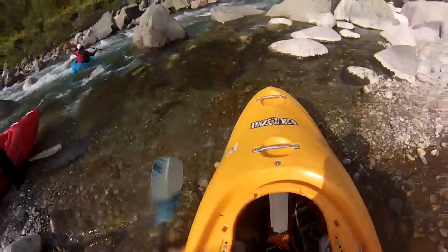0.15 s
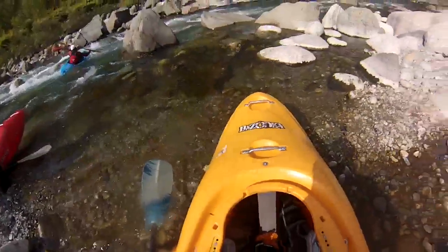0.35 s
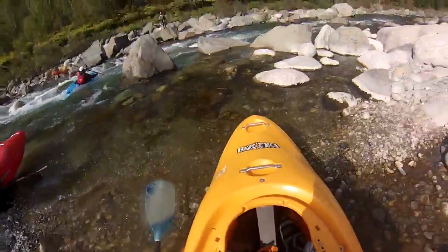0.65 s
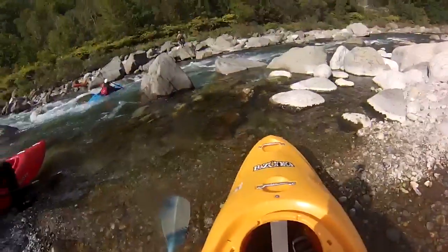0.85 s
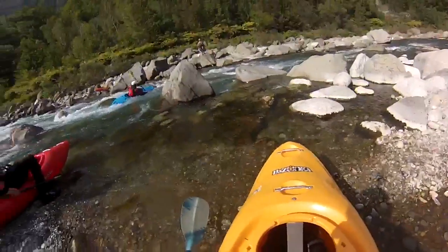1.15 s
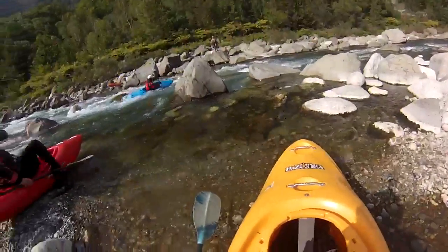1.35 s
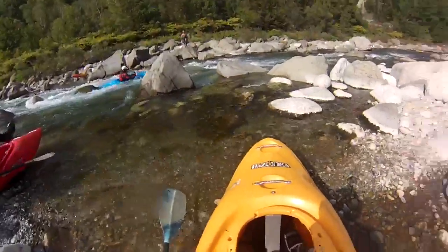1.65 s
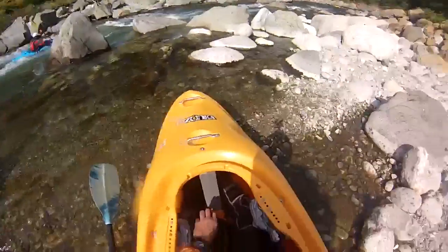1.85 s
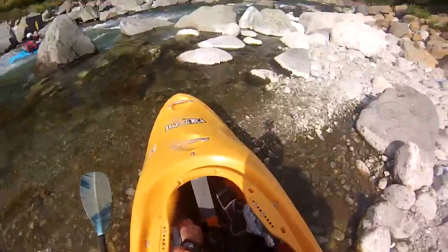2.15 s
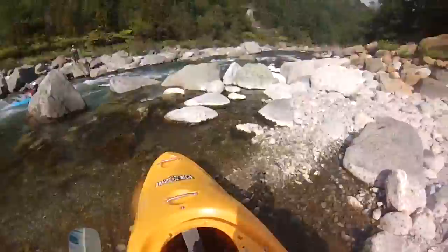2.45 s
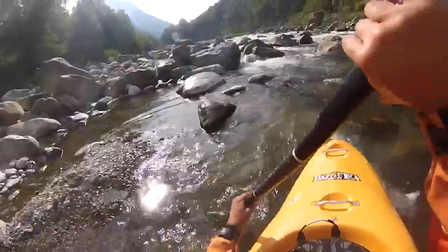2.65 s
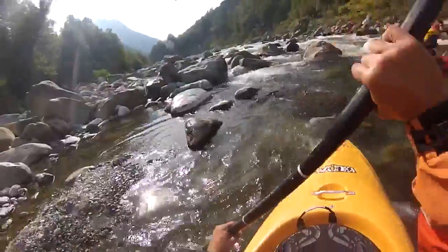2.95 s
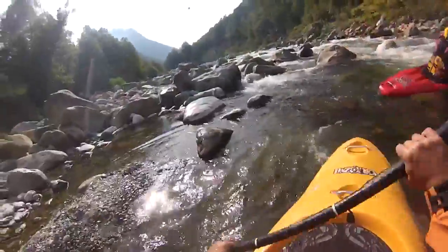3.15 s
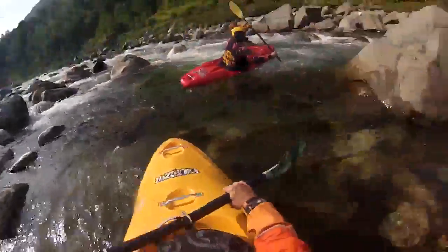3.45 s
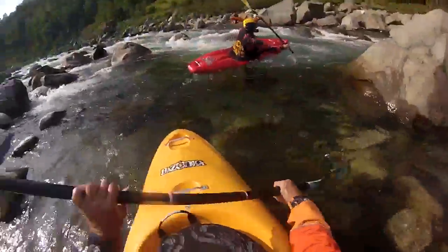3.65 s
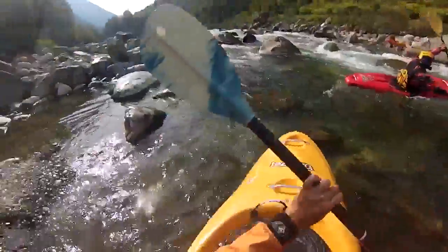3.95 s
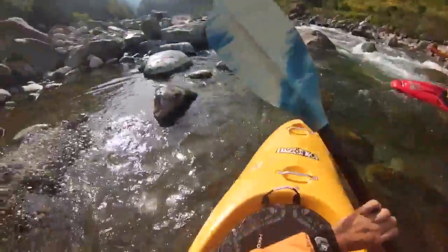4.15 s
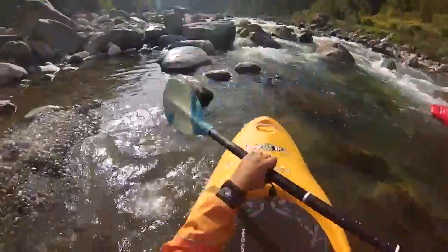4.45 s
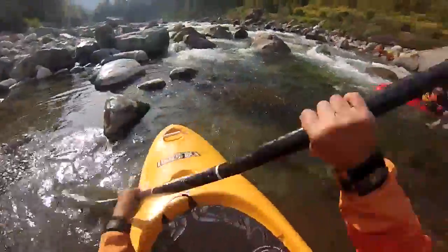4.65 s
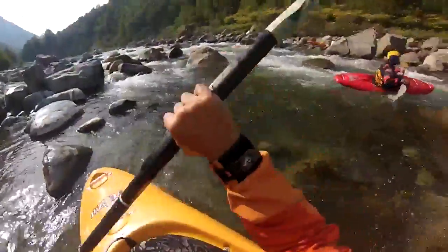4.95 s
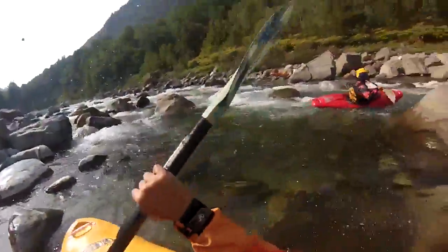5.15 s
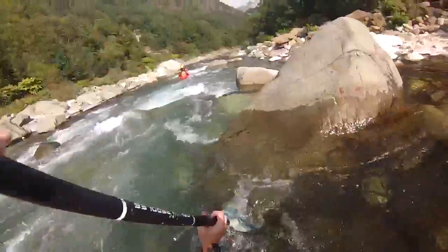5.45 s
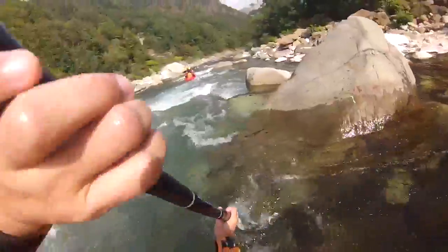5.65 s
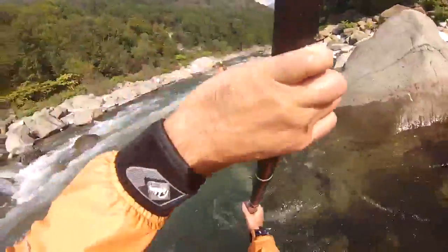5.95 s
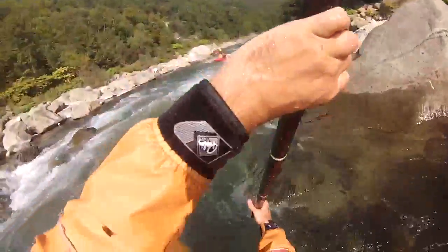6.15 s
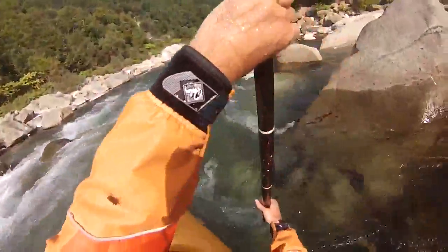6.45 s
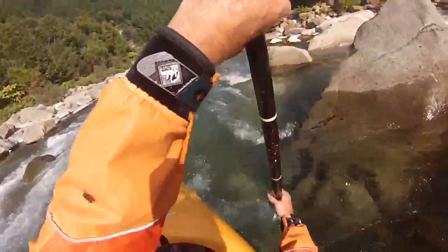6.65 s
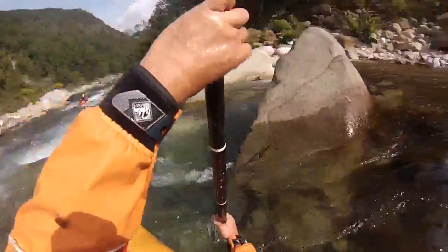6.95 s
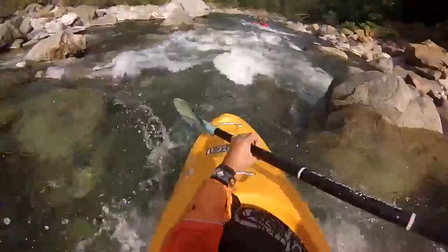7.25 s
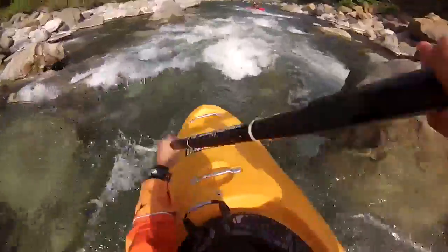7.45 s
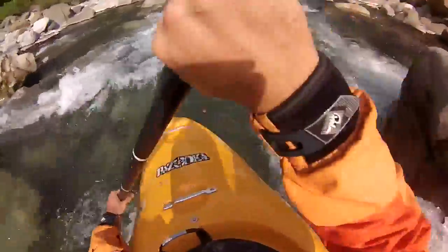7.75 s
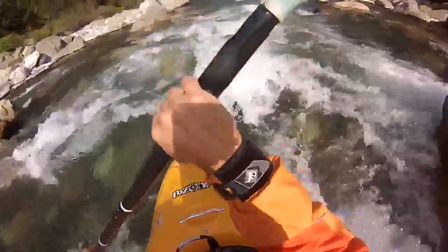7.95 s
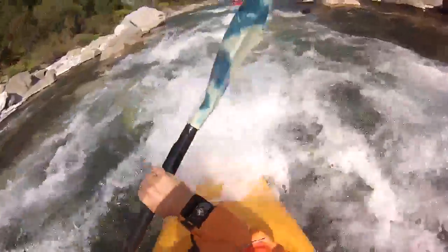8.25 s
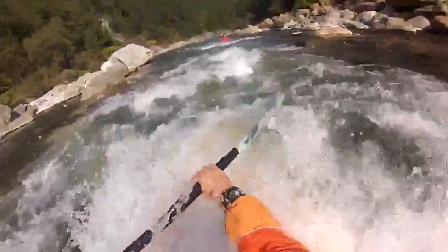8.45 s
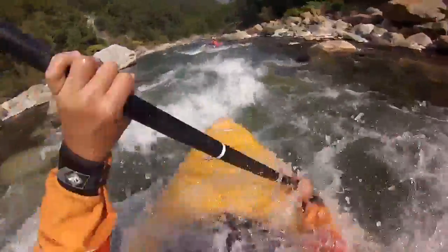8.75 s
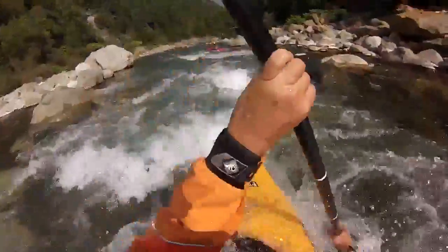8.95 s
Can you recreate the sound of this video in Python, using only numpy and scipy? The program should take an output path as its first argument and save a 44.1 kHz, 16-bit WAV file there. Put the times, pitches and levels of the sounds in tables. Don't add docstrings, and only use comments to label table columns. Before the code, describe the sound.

A kayak's rapids rush steadily louder under low wind buffeting, with close paddle splashes, plastic hull knocks, tiny drop ticks and short silent gaps.

```python
import sys
import numpy as np
from scipy import signal
from scipy.fft import rfft, irfft, next_fast_len
from scipy.io import wavfile
from scipy.ndimage import uniform_filter1d

SR = 44100
rng = np.random.default_rng(int(sys.argv[2]) if len(sys.argv) > 2 else 0)


def wav_record(signal):
    frames = np.transpose(np.atleast_2d(signal))
    bounded = np.clip(frames, -1, 1)
    quanta = np.round(bounded * 32767).astype(np.int16)
    wavfile.write(sys.argv[1], SR, quanta)


def ratio_of_db(decibels):
    return 10 ** (np.asarray(decibels, float) / 20)


N = 402191
TIME = np.arange(N) / SR

# (time [s], roar [dB], foam [dB])
RIVER_DISTANCE = [(0.03, -50.5, -1.5), (.4, -57, 4), (.8, -53.5, -0.5), (1.5, -56.5, 3), (2.5, -53.5, -0.5),
                  (2.62, -53, 0), (4.1, -54.5, 1), (4.68, -54.5, 2), (4.83, -45, -6.5), (5.0, -48, -4.5),
                  (5.24, -52, -1.5), (5.34, -48.5, -3), (7.2, -47, -1.5), (7.6, -45.5, -1.5),
                  (7.95, -42.5, 1), (8.25, -41, 1.5), (8.6, -40.5, 0), (9.02, -40.5, -2.5)]
# (frequency [Hz], density [dB per Hz])
WATER_COLOUR = [(60, -4), (110, 1.5), (300, 0), (800, -4), (1900, 2.5), (2650, -8.5), (2850, -17),
                (6000, -16), (7000, -18), (8000, -23.5), (8700, -27.5), (11000, -31), (15300, -37)]
DRUM_LO_HZ, DRUM_HI_HZ = 38.1, 55.6


def evened(x):
    return x / np.sqrt(np.mean(abs(x) ** 2) + 1e-20)


def read(points, hz):
    f, value = np.transpose(points)
    return np.interp(np.log(hz + 1), np.log(f + 1), value)


def controls(table, t):
    s, *columns = np.transpose(table)
    return [np.interp(t, s, c) for c in columns]


def add(mix, s, sound):
    part = mix[round(s * SR):][:len(sound)]
    part += sound[:len(part)]


def coloured(x, gain):
    size = next_fast_len(N)
    return irfft(rfft(x, size) * gain(np.fft.rfftfreq(size, 1 / SR)), size)[:N]


def above(hz, edge_hz, soft):
    return .5 + .5 * np.tanh(np.log((hz + 1) / edge_hz) / soft)


def swells(events, t):
    coarse = np.linspace(0, N / SR, 2000)
    lift_db = sum(db * np.exp(-4 * np.log(2) * ((coarse - s) / length) ** 2) for s, db, length in events)
    return np.interp(t, coarse, lift_db)


def through_case(hz):
    # (frequency [Hz], width [Hz], level over the water colour [dB])
    cavities = [(687.5, 24, 2.5), (1085, 140, 3.5), (1413, 406, 12.5), (1867, 98, -6.5), (2360, 560, 13.5),
                (3055, 98, 4.5), (3600, 710, 5.5), (4170, 60, 3.5), (4866, 140, 6), (5300, 280, 3.5),
                (5880, 240, -2.5), (6100, 280, 1.5), (7230, 300, -5), (7680, 660, 2.5), (10900, 1900, 3)]
    lift_db = sum(db / (1 + (2 * (hz - f) / width) ** 2) for f, width, db in cavities)
    return ratio_of_db(read(WATER_COLOUR, hz) + lift_db)


def bubbles(per_s, spread_db, cycles, count):
    out = np.zeros(N)
    for hz in np.geomspace(150, 14000, count):
        turns = np.arange(int(3 * cycles * SR / hz)) * hz / SR
        ping = np.sin(2 * np.pi * turns * (1 + 0.017 * turns)) * turns * np.exp(-3 * turns / cycles)
        chance, size = rng.random(N), rng.exponential(1, N)
        train, hit = np.zeros(N), chance < per_s * hz ** .5 / 40 / count / SR
        train[hit] = ratio_of_db(spread_db * np.minimum(size[hit], 4))
        out += evened(signal.oaconvolve(train, ping)[:N]) * hz ** .5
    return evened(out)


def water(t):
    # (start [s], low wash re roar [dB], fizz re roar [dB],
    # sound between the two main cavities re roar [dB], upper flank of the first cavity [dB])
    shots = [
        (0, -2.5, -10, -17, 6),
        (2.556, -1, -8.5, -15.5, -0.5),
        (3.92, 0.2, -7, -13, 1),
        (5.29, -1.5, -6, -11.5, 2.5),
        (7.256, -4.5, -5, -13, -0.5),
        (9.056, -2, -4.5, -12, .1),
    ]
    # (time [s], lift of the roar [dB])
    waves = [(.67, 0), (1.05, 0.5), (1.7, 0.5), (2.46, 0), (3.27, 0.5), (3.53, 2), (4.17, 1.5), (4.3, -3),
             (4.43, 3.5), (5.88, -1.5), (6.14, 2), (6.27, -1), (6.46, 2.5), (6.66, -1), (7.83, 1),
             (7.96, -2), (8.59, 4), (8.72, -1.5)]
    # (time [s], lift of the low wash [dB], length [s])
    surges = [
        (4.98, -2, 0.63),
        (6.04, 1, 0.28),
        (8.3, -1, 0.36),
        (7.66, 4.5, 0.42),
    ]
    wave_s, last_roar_db = 0.12, -54
    wash_steady = 0.83
    gap_per_foam = 0.67
    near_db, foam_db = controls(RIVER_DISTANCE, t)
    starts, *mix_db = np.transpose(shots)
    shot = np.maximum(np.searchsorted(starts, t) - 1, 0)
    wash_db, fizz_db, gap_db, flank_db = (m[shot] for m in mix_db)
    near_db = np.where(shot == len(shots) - 1, last_roar_db, near_db)
    wave_db = swells([(*wave, wave_s) for wave in waves], t)
    steady_db = foam_db - wash_steady * wave_db
    wash_db = wash_db + steady_db + swells(surges, t)
    return near_db + wave_db, wash_db, fizz_db + steady_db, gap_db + gap_per_foam * steady_db, flank_db


def turning(hz, t):
    # (time [s], lift [dB], length [s], centre [Hz])
    head_turns = [(.8, 3, .3, 3500), (2.85, 2, .5, 5100), (3.5, 2, 1, 5200), (3.6, -2, 1.3, 7600),
                  (4.15, 3, .5, 1000), (4.3, 5, 0.62, 1900), (4.5, 2, 0.27, 5440), (5.05, 6, .4, 5000),
                  (5.0, 2, .6, 7800), (4.7, 3, .7, 10800), (5.6, -3.5, .4, 5300), (6.3, 2, 1.2, 9000),
                  (6.7, -1.5, .9, 1059), (7.45, -3, 0.27, 1910), (7.85, -1, 0.52, 2350), (8.1, 3, .7, 6100),
                  (8.2, -2.5, 0.99, 3080), (8.205, 0, .5, 7200), (8.0, -1.5, .8, 9400),
                  (8.25, 0, .5, 10800), (8.3, -2.5, 1.5, 13800)]
    octaves = 0.1
    bands = np.array([np.exp(-.5 * (np.log2((hz + 1) / turn[3]) / octaves) ** 2) for turn in head_turns])
    return bands.T @ np.array([swells([turn[:3]], t) for turn in head_turns])


def river():
    nearness = np.clip((controls(RIVER_DISTANCE, TIME)[0] + 60) / 60, 0, 1)
    drive = np.sqrt(1 - nearness) * rng.standard_normal(N)
    drive += np.sqrt(nearness) * bubbles(2500, spread_db=0.5, cycles=4.0, count=30)
    hz, t, z = signal.stft(drive, SR, nperseg=512, noverlap=384)
    roar_db, wash_db, fizz_db, gap_db, flank_db = water(t)
    patches = uniform_filter1d(rng.standard_normal(z.shape), size=8, axis=0)
    patches = evened(uniform_filter1d(patches, size=16, axis=1))
    flicker = evened(uniform_filter1d(rng.standard_normal(len(t)), size=5))
    colour = through_case(hz)
    high, low = above(hz, 2860, 0.09), 1 - above(hz, 994, 0.14)
    gap = above(hz, 1550, 0.01) - above(hz, 2470, 0.038)

    def strength(lo, hi):
        return np.sqrt((colour[(hz > lo) & (hz < hi)] ** 2).sum() / len(hz))

    layers = np.outer((1 - high - low - gap) / strength(1000, 2900), np.ones(len(t)))
    layers += np.outer(low / strength(110, 1100), ratio_of_db(wash_db))
    layers += np.outer(gap / strength(1750, 2050), ratio_of_db(gap_db))
    layers += np.outer(high / strength(2664, 8700), ratio_of_db(fizz_db))
    z = z * layers * ratio_of_db(roar_db + turning(hz, t) + 0.61 * patches + 0.56 * flicker)
    flank = np.exp(-((hz - 1620) / 137) ** 2)
    z *= ratio_of_db(np.outer(flank, flank_db))
    return coloured(signal.istft(z, SR, nperseg=512, noverlap=384)[1][:N], through_case)


def drumming(noise):
    # (start [s], length [s], level [dB])
    drum_bouts = [(.1, 0.13, -41), (1.002, .15, -47.5), (1.98, 0.069, -32), (2.65, 0.27, -48),
                  (3.303, 0.12, -43), (3.6, 0.19, -41), (4.028, .037, -29), (4.088, 0.029, -34),
                  (4.154, .053, -35), (4.746, .067, -35), (4.85, .2, -41), (5.104, 0.091, -43),
                  (5.498, 0.13, -42.5), (6.0, 0.22, -40), (6.816, 0.076, -35), (7.702, .1, -44),
                  (7.867, 0.089, -36.5), (8.137, .04, -35), (8.302, 0.1, -38), (8.405, .042, -32),
                  (8.541, 0.13, -33)]
    calm_db = -47.5
    note = coloured(noise, lambda f: above(f, DRUM_LO_HZ, 0.06) - above(f, DRUM_HI_HZ, 0.13))
    lumps = np.sqrt(abs(uniform_filter1d(uniform_filter1d(note ** 2, size=1500), size=1500)))
    coarse = np.linspace(0, N / SR, 2000)
    level = ratio_of_db(calm_db)
    for s, length, db in drum_bouts:
        level = level + ratio_of_db(db) * np.exp(-(2 * (coarse - s - length / 2) / (1.2 * length)) ** 4)
    return np.interp(TIME, coarse, level) * evened(note / (lumps + 0.076 * lumps.mean()))


def wind():
    # (time [s], buffeting [dB])
    strengths = [(0, -24), (.35, -34.5), (1.0, -33.5), (1.6, -34.5), (2.0, -28.5), (2.5, -33), (2.65, -29),
                 (3.5, -34), (4.2, -36.5), (5.0, -31), (5.25, -37.5), (5.4, -38), (6.1, -37), (7.1, -35),
                 (7.35, -29), (8.0, -32), (8.65, -27), (9.1, -26.5)]
    # (frequency [Hz], density [dB per Hz])
    buffet_colour = [(3, -11), (6, -2), (16, 2), (30, -4), (40, -0.5), (50, -14.5), (63, -16.5), (90, -28),
                     (150, -32), (220, -40), (400, -120)]
    # (time [s], lift of the buffeting [dB], length [s])
    gusts = [(.03, 12, 0.14), (.23, 5, 0.091), (.6, 7, 0.28), (.84, 9, 0.17), (1.22, 5, 0.23),
             (1.45, 6.5, 0.15), (1.95, 8.5, 0.071), (2.25, 2, .12), (2.73, 2, 0.13), (3.14, -7, 0.052),
             (3.35, 14, 0.025), (3.76, 2.5, 0.056), (3.97, 7.5, 0.25), (4.17, 12.5, 0.17), (4.48, 8, 0.3),
             (4.58, -10.5, 0.13), (4.69, 3.5, 0.39), (4.99, 2.5, 0.15), (5.48, 6.5, 0.097),
             (5.69, 3.5, 0.15), (5.9, -1, 0.11), (6.14, 5.5, 0.13), (6.43, 2.5, .12), (6.74, 8, 0.06),
             (7.06, -1, 0.11), (7.86, 5, 0.24), (8.05, -3.5, 0.099), (8.15, 5.5, 0.2), (8.6, 11, 0.11),
             (8.97, -2, 0.14)]
    # (time [s], lift over the calm level [dB], length [s])
    flutters = [(.02, 18, 0.23), (.36, 10, 0.18), (.74, 9, 0.18), (.94, 8, 0.14), (1.35, 5, 0.079),
                (1.55, -2, 0.13), (2.005, 26, 0.05), (2.36, 7.5, 0.15), (2.95, 7.5, 0.53), (3.25, 4, 0.13),
                (3.66, -12, .12), (3.95, 6, 0.17), (4.17, -8, .12), (4.53, -8, 0.18), (4.78, 5, 0.13),
                (5.78, 16, 0.17), (5.93, 8, 0.16), (6.11, 15, 0.24), (6.4, 13, 0.23), (6.85, 28, 0.087),
                (7.17, 8.5, 0.13), (7.33, 5, .12), (7.64, 10, 0.1), (7.84, 12, 0.18), (8.4, 13.5, 0.21),
                (8.66, 15.5, .12), (8.87, 12, 0.11)]
    # (time [s], peak [dB], pitch
    # [Hz], direction and share [-1 to 1])
    thumps = [(0.0, -22, 3.1, 0.88), (9.113, -29, 18, 1), (.113, -15, 18.6, 0.85), (2.152, -18, 30, 0.89),
              (2.711, -19.5, 15.3, 0.9), (8.178, -16, 27.5, 0.93), (2.009, -8.5, 37.4, 0.89),
              (4.063, -12.5, 22, -0.82), (4.406, -13, 21.3, -0.9), (6.851, -19.5, 25.5, 0.81),
              (8.59, -12, 23.3, -0.8)]
    calm_flutter_db, flutter_per_wind = -59, 0.01
    buffet_db = controls(strengths, TIME)[0] + swells(gusts, TIME)
    flutter_db = calm_flutter_db + flutter_per_wind * (buffet_db - buffet_db.mean()) + swells(flutters, TIME)
    noise = coloured(rng.standard_normal(N), lambda f: ratio_of_db(read(buffet_colour, f)))
    slow = coloured(noise, lambda f: 1 - above(f, DRUM_LO_HZ, 0.11))
    lumps = np.sqrt(uniform_filter1d(slow ** 2, size=4000, mode="reflect"))
    slow = evened(slow / (uniform_filter1d(lumps, size=3000) + 0.088 * lumps.mean()) ** 0.88)
    flutter = evened(coloured(noise, lambda f: above(f, 53.0, 0.047)))
    out = ratio_of_db(buffet_db - 2.0) * slow + drumming(noise) + ratio_of_db(flutter_db) * flutter
    for s, db, hz, way in thumps:
        near = slice(*np.searchsorted(TIME, [s - 2 / hz, s + 2 / hz]))
        u = (np.pi * hz * (TIME[near] - s)) ** 2
        out[near] *= 1 - .8 * np.exp(-u / 3)
        out[near] += way * ratio_of_db(db) * (1 - 2 * u) * np.exp(-u)
    return out


def electronics():
    # (frequency [Hz], level [dB])
    whines = [(3478, -96), (3537, -87), (6955, -92), (7014, -94), (10492, -94), (12290, -96), (13964, -90),
              (15224, -101)]
    # (frequency [Hz], density [dB per Hz])
    hiss_colour = [(100, -118), (6000, -118), (9000, -114), (12500, -115), (13500, -117), (15300, -121)]
    out = coloured(rng.standard_normal(N), lambda f: ratio_of_db(read(hiss_colour, f)) * np.sqrt(SR / 2))
    wander = np.cumsum(rng.standard_normal(N)) * .03
    for hz, db in whines:
        out += np.sqrt(2) * ratio_of_db(db) * np.sin(2 * np.pi * hz * TIME + wander)
    return out


def knocks():
    # (time [s], peak [dB], pitch [Hz], t60
    # [s])
    ringing_hits = [(.364, -38, 1440, 0.042), (2.003, -32.5, 126, .07), (.086, -54, 5050, .04),
                    (.117, -52, 5000, .03), (.15, -50, 5050, .03), (.209, -51, 5000, .035),
                    (.047, -57, 5000, .03), (4.672, -30, 2600, 0.05), (4.6715, -35, 1327, 0.06),
                    (4.671, -40, 4850, .025), (4.67, -43, 7000, .018), (3.999, -40.5, 231, 0.065),
                    (4.331, -35.5, 255, 0.15), (4.36, -45, 300, 0.2), (2.634, -35, 2150, .04),
                    (2.818, -40, 2300, .045), (2.877, -31, 2450, .04), (2.842, -42, 5300, .03),
                    (2.843, -45, 6450, .025), (7.6, -42, 4200, .05), (7.752, -30.5, 230, 0.037)]
    out, t = np.zeros(N), np.arange(SR // 4) / SR
    for s, db, hz, t60 in ringing_hits:
        ring = np.sin(2 * np.pi * hz * t * (1 - 1.8 * t))
        add(out, s, ratio_of_db(db - 60 * t / t60) * ring * np.minimum(t / 0.0023, 1))
    return out


def puffs(events, octaves, rise_s):
    out, t, hz = np.zeros(N), np.arange(8192) / SR, np.fft.rfftfreq(8192, 1 / SR)
    colour = through_case(hz) ** 0.52
    for (s, db, centre_hz, t60), noise in zip(events, rng.standard_normal((len(events), 8192))):
        band = np.exp(-.5 * (np.log2((hz + 1) / centre_hz) / octaves) ** 2) * colour
        band *= 1 - 0.38 * np.exp(-((hz - 1820) / 170) ** 2)
        shape = ratio_of_db(db - 4.0 - 60 * t / max(t60, .005)) * np.minimum(t / rise_s, 1)
        add(out, s, shape * evened(irfft(rfft(noise) * band)))
    return out


def splashes():
    # (time [s], peak [dB], centre [Hz], t60 [s])
    ticks = [(.047, -54, 4950, .03), (.085, -49, 5000, 0.031), (.118, -49, 5000, .03),
             (.15, -50, 5200, .03), (.209, -51, 5800, .03), (.365, -50, 4900, .05), (1.27, -56, 6600, .05),
             (1.924, -44, 5470, 0.027), (2.479, -54, 4800, 0.028), (2.505, -39, 3680, 0.027),
             (2.63, -40, 4750, 0.03), (2.662, -45, 4830, 0.03), (2.766, -46, 3600, 0.047),
             (2.816, -34, 4800, 0.029), (2.842, -38, 5700, 0.027), (3.019, -44, 4500, 0.036),
             (4.67, -42, 4900, 0.026), (4.672, -45, 3600, .04), (2.685, -39, 4200, 0.022),
             (2.796, -45, 4600, 0.03), (2.856, -50, 5000, .03), (2.876, -43, 3600, .04),
             (2.939, -52, 6200, .03), (2.999, -46, 4750, .04), (4.724, -47, 3660, .04),
             (4.787, -50, 3920, .04), (4.832, -43, 5440, 0.035), (4.889, -46, 4500, .03),
             (4.998, -49, 5000, .03), (5.039, -48, 3580, .04), (5.112, -46, 3720, .04),
             (7.752, -46, 6100, .03), (7.806, -47.5, 5170, .03), (7.962, -46, 7500, .03),
             (8.215, -37, 5600, .04), (4.93, -44, 4000, 0.06), (8.8075, -23.5, 3370, 0.01)]
    # (time [s], peak [dB], centre [Hz], t60 [s])
    drips = [(.922, -59, 7750, 0.097), (.97, -54, 7750, .05), (.97, -58, 6100, 0.074),
             (1.195, -60, 7600, .12), (1.235, -60, 7530, .1), (.775, -59, 6200, .05), (.97, -52, 3650, .05),
             (2.63, -41, 4900, .04), (2.63, -39, 3500, .04), (2.662, -45, 4800, .04),
             (2.765, -44, 3500, 0.062), (2.764, -44, 5300, .04), (2.83, -42, 4950, .025),
             (2.842, -40, 5300, .04), (4.4, -54, 5400, .12), (4.49, -55, 5300, .15), (.066, -54, 4800, .05),
             (.366, -54, 4950, 0.05), (8.807, -39, 3050, .03), (8.807, -37, 3680, .03),
             (4.838, -46, 3700, .15), (2.686, -35, 2250, .05), (2.695, -45, 3200, .05),
             (2.819, -42, 2250, .05), (4.835, -40, 2400, .1), (4.845, -42, 1450, 0.2),
             (4.93, -38, 2200, .08), (4.848, -50, 7500, .04)]
    # (time [s], peak [dB], centre [Hz], t60 [s])
    thuds = [(0.42, -43, 1300, 0.036), (1.373, -44, 1100, .05), (1.926, -46, 480, 0.07),
             (1.925, -45, 1200, .05), (2.004, -38, 390, 0.042), (2.007, -37.5, 3400, 0.019),
             (3.996, -39.5, 590, 0.12), (4.008, -35, 480, 0.048), (4.3, -47, 760, 0.1),
             (4.675, -34, 1230, 0.09), (4.672, -35.5, 530, .08), (2.69, -43, 1200, .1),
             (2.817, -38, 1100, .05), (4.301, -42, 1100, .04), (3.998, -44, 1200, .04),
             (7.62, -35.5, 400, .08)]
    # (time [s], peak [dB])
    spray = [(2.0067, -54), (4.4, -59), (4.43, -59), (4.49, -58), (4.625, -58), (4.658, -58), (4.69, -59),
             (4.673, -51), (4.7322, -58), (4.795, -55), (4.865, -61), (4.8893, -51), (4.912, -58),
             (4.947, -58), (5.143, -57), (6.3531, -53), (6.4758, -54), (6.6185, -49), (7.8292, -60),
             (8.1294, -45), (8.808, -46)]
    # (time [s], peak [dB], centre [Hz], t60 [s])
    paddle = [(2.6152, -35, 2380, 0.06), (2.6297, -35, 2200, 0.052), (2.6566, -39, 2410, 0.059),
              (2.685, -37, 2280, 0.097), (2.7386, -36, 2360, 0.04), (2.7663, -33, 2560, 0.038),
              (2.7908, -48, 2420, 0.06), (2.8162, -33.5, 2220, 0.06), (2.8752, -36, 2560, 0.051),
              (2.908, -45, 2440, 0.047), (2.9437, -44, 2615, 0.06), (2.997, -41, 2410, 0.087),
              (3.0417, -40.5, 2120, 0.054), (3.078, -50, 2486, 0.055), (3.9998, -39.5, 2140, 0.048),
              (4.3031, -57, 1840, 0.06), (4.672, -33, 2520, 0.05), (4.686, -39, 1900, 0.05),
              (4.7916, -42, 2110, 0.04), (4.806, -37, 1700, 0.06), (4.8327, -38, 2410, 0.16),
              (4.8884, -38.5, 2220, 0.21), (4.927, -33, 2280, 0.15), (4.855, -38, 1500, .1),
              (4.9, -40, 1500, .1), (4.96, -39, 2300, .1)]
    spray_hz, spray_t60_s = 11000, 0.014
    wet = puffs(ticks, octaves=.22, rise_s=.0015)
    wet += puffs(drips, octaves=.05, rise_s=0.0039)
    wet += puffs(thuds, octaves=0.8, rise_s=0.0016)
    wet += puffs([(*drop, spray_hz, spray_t60_s) for drop in spray], octaves=.24, rise_s=.0006)
    return wet + puffs(paddle, octaves=0.64, rise_s=0.0019)


def runoff():
    # (start [s], fullest [s], end [s], level [dB], thin share [0-1])
    strokes = [
        (0.718, 0.747, 1.15, -61.5, 0.8),
        (2.6, 2.632, 3.5, -53.5, 0),
        (2.694, 2.838, 2.93, -48.5, 0.02),
        (4.39, 4.486, 4.52, -57, 0.4),
        (4.827, 4.844, 5.3, -46, 0.18),
    ]
    # (frequency [Hz], lift [dB])
    droplet_colour = [(300, -21), (700, 15.5), (1100, 8.5), (1500, -6), (2300, 5), (3700, 17.5), (5500, 5),
                      (7800, 7), (8600, -5), (11000, 2), (13000, -4)]

    def colour(f):
        open_air = ratio_of_db(read(WATER_COLOUR, f))
        return ratio_of_db(read(WATER_COLOUR, f) + read(droplet_colour, f)) * (through_case(f) / open_air) ** 0.89

    drops = 0.45 * bubbles(2200, spread_db=3.5, cycles=4.0, count=16) + .5 * rng.standard_normal(N)
    drops = evened(coloured(drops, colour))
    thin = evened(coloured(drops, lambda f: above(f, 6500, 0.6)))
    out = np.zeros(N)
    for *times, db, share in strokes:
        flow = np.interp(TIME, times, [0, 1, 0]) ** 1.13
        out += ((1 - share) * drops + share * thin) * ratio_of_db(db) * flow
    return out


def blips():
    # (time at the top [s], peak [dB], pitch [Hz], length [s])
    rising = [(1.394, -47, 330, .026), (4.001, -42, 800, .011), (4.293, -49, 270, .03),
              (4.305, -45.5, 760, .013), (4.316, -49, 1150, .02), (7.505, -37, 440, .022),
              (7.521, -35.5, 1090, .018), (7.815, -45, 670, .02), (1.937, -44, 420, .026),
              (8.8093, -29, 3500, .0022), (8.8093, -42, 11500, .0012), (8.8093, -48, 14000, .0012),
              (4.984, -43, 3750, .004), (2.82, -51, 6600, .007), (2.765, -55, 6700, .006),
              (2.687, -48, 5100, .006), (2.858, -48, 5300, .006)]
    rise = 0.25
    out = np.zeros(N)
    for s, db, hz, length in rising:
        u = np.arange(-.5, .5, 1 / (length * SR))
        turns = hz * length * (u + .5 * rise * u ** 2)
        add(out, s - length / 2, ratio_of_db(db) * np.cos(np.pi * u) ** 2 * np.sin(2 * np.pi * turns))
    return out


def thinned(x, edge_hz, hush_db):
    hz, t, z = signal.stft(x, SR, nperseg=2048, noverlap=1536)
    power = uniform_filter1d(uniform_filter1d(abs(z) ** 2, size=4, axis=0), size=3, axis=1)
    level_db = 10 * np.log10(power + 1e-20)
    moment_db = 2.4 * evened(uniform_filter1d(rng.standard_normal(len(t)), size=4))
    whim = uniform_filter1d(rng.standard_normal(z.shape), size=7, axis=0)
    whim_db = 3 * evened(uniform_filter1d(whim, size=4, axis=1))
    heard = np.minimum(level_db, hush_db + 4) + moment_db + whim_db > hush_db
    z = z * np.where(hz[:, None] < edge_hz, 1, np.where(heard, 1.3, 0))
    return signal.istft(z, SR, nperseg=2048, noverlap=1536)[1][:N]


def scene():
    return (river() + wind() + electronics() + knocks() + splashes() + runoff() + blips())[None]


def top_cut(x):
    return signal.sosfilt(signal.butter(12, 15290, fs=SR, output="sos"), x)


def record(dry):
    # (time [s], pressure step [dB], gain of the sound [dB])
    steps = [
        (2.5257, -31.5, -3),
        (5.2588, -34, 6.5),
        (9.026, -43, -31),
    ]
    # (fade-out starts [s], silence starts [s], silence ends [s], fade-in done [s])
    joins = [
        (2.465, 2.54, 2.572, 2.635),
        (5.195, 5.273, 5.306, 5.37),
        (7.165, 7.24, 7.273, 7.335),
        (8.965, 9.04, 9.072, 9.135),
    ]
    edited = thinned(dry[0], edge_hz=12800, hush_db=-104.5)[None]
    for s, step_db, gain_db in steps:
        after = (TIME >= s) & (TIME < s + .03)
        sag = 2.7 * ratio_of_db(step_db) * np.exp(-abs(TIME - s) / 0.0068)
        edited = np.where(after, edited * ratio_of_db(gain_db) + ratio_of_db(step_db), edited - sag)
    for out_s, mute_s, back_s, in_s in joins:
        edited *= np.interp(TIME, [out_s, mute_s, back_s, in_s], [1, 0, 0, 1])
    return top_cut(edited)


dry = scene()
out = record(dry)
wav_record(out)
```